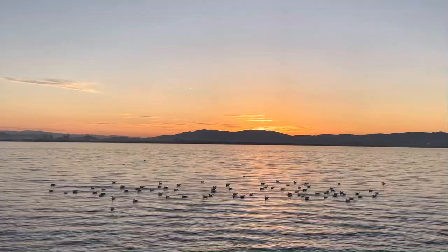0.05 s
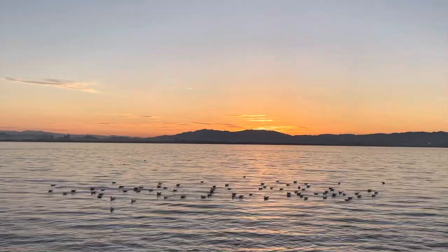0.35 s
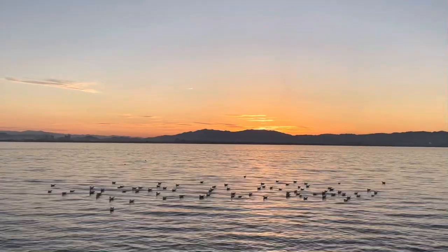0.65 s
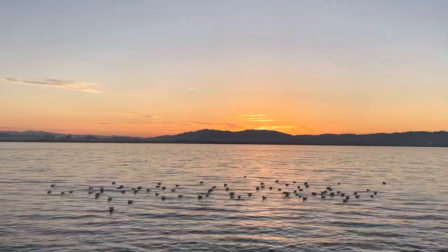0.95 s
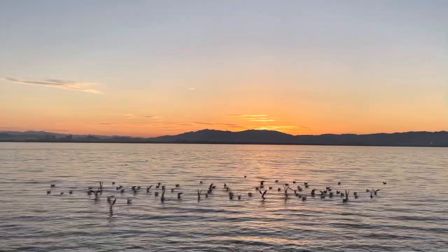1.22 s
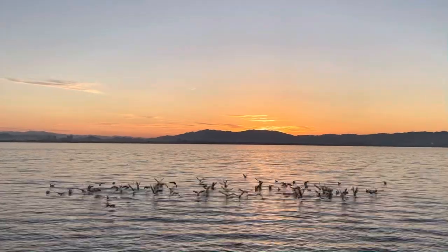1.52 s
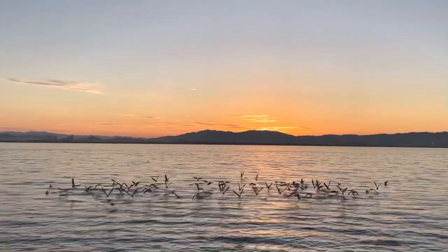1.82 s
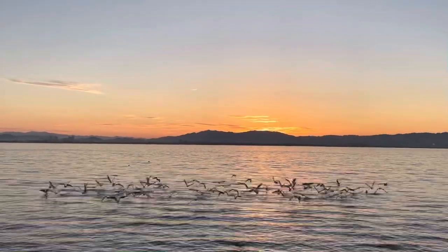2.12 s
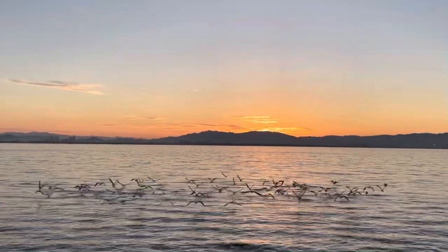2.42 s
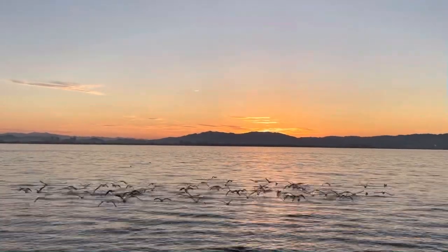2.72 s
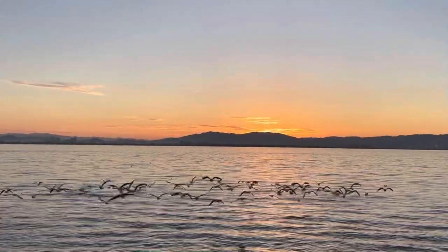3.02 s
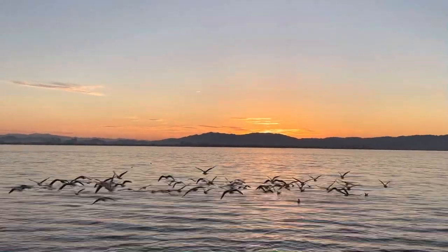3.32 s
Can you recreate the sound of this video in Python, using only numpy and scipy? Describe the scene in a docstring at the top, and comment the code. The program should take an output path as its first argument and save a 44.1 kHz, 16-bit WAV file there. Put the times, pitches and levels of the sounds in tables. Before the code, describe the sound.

A flock of gulls bursts into overlapping cries and rasps far out on a calm lake, wings pattering on the water, then gives two short barks. Wavelets lap and bubble close to the shoreside microphone throughout, over light wind.

```python
"""The shore of a calm lake, with a stereo microphone near the waterline. Close by, wavelets lap, splash
and bubble; a light wind rumbles underneath. Far out a flock of gulls lifts off, wings pattering on the
water, and bursts into overlapping calls: arched cries shaped by throat resonances, rasps chopped into
fast pulses, then two short barks as it flies off. The rippled water adds a short tail to each call."""
import sys
import numpy as np
from scipy import signal
from scipy.fft import rfft, irfft, next_fast_len
from scipy.io import wavfile
from scipy.ndimage import map_coordinates

SR = 44100
rng = np.random.default_rng(int(sys.argv[2]) if len(sys.argv) > 2 else 0)


def generate_wav(sig):
    """Save sig (samples, or channels by samples) to the path in sys.argv[1] as 16-bit PCM at SR."""
    pcm = np.round(np.clip(np.atleast_2d(sig).T, -1, 1) * 32767).astype(np.int16)
    wavfile.write(sys.argv[1], SR, pcm)


N = 156555
TOP_HZ = 13264  # upper band limit of the microphone


def amp(db):
    """Decibels as an amplitude."""
    return 10 ** (np.asarray(db) / 20)


def unit(x):
    """Scale to an rms of 1."""
    return x / np.sqrt(np.mean(x ** 2) + 1e-20)


def along(points, hz):
    """Read (frequency, value) points on a log frequency axis."""
    freqs, values = np.transpose(points)
    return np.interp(np.log(hz + 1), np.log(freqs + 1), values)


def curves(rows):
    """One value per sample for each column after the time."""
    times, *columns = np.transpose(rows)
    return [np.interp(np.arange(N) / SR, times, column) for column in columns]


def wobble(rate, size):
    """A smooth random curve, rate knots a second."""
    return map_coordinates(rng.standard_normal(2 ** 11), [np.arange(size) * rate / SR])


def glide(arc_hz, size):
    """A smooth arc of pitch through its start, middle and end."""
    return np.polyval(np.polyfit([0, .5, 1], arc_hz, 2), np.linspace(0, 1, size))


def filtered(x, response):
    """Apply a gain given as a function of frequency."""
    size = next_fast_len(N + SR // 2)
    return irfft(rfft(x, size) * response(np.fft.rfftfreq(size, 1 / SR)), size)[..., :N]


def add(track, start, sound, pan_db):
    """Mix a sound in at start seconds, pan_db louder on the left than on the right."""
    part = track[:, max(0, round(start * SR)):][:, :len(sound)]
    part += amp([[pan_db / 2], [-pan_db / 2]]) * sound[:part.shape[1]]


def spread(pair, colour):
    """Two unrelated signals become a coloured stereo field of rms 1, wider in the treble."""
    # likeness of left and right at the microphone (frequency [Hz], correlation [-1..1])
    likeness = [(60, 0.92), (130, 0.97), (300, 0.58), (1200, 0.15), (2500, 0.53), (5000, 0.24),
                (10000, -0.14)]

    def mid_side(hz):
        angle = np.arccos(np.clip(along(likeness, hz), -1, 1)) / 2
        return amp(along(colour, hz)) * [np.cos(angle), np.sin(angle)]
    mid, side = filtered(pair, mid_side)
    return unit(np.array([mid + side, mid - side]))


def rush(colour):
    """Coloured stereo noise."""
    return spread(rng.standard_normal((2, N)), colour)


def wind(rumble_db=-46.5, gust_db=1.55, hush_db=-61):
    """Light wind rumbles unsteadily under the far hush of the open lake."""
    # spectra of the wind and of the hush (frequency [Hz], relative level [dB])
    rumble_colour = [(12, -30), (24, -24), (35, -14.5), (60, 1.5), (75, -2), (97, -7.5), (173, -10.5),
                     (219, -12.5), (400, -26), (520, -58), (880, -85)]
    hush_colour = [(150, 2.5), (500, 12), (1500, -3), (5000, -24), (7500, -35), (12000, -46)]
    rumble = rush(rumble_colour) * amp(rumble_db + gust_db * wobble(9.93, N))
    return rumble + amp(hush_db) * rush(hush_colour)


def bubble(hz, cycles, rise=0.081):
    """A bubble rings and rises in pitch, dying by 60 dB over its cycles."""
    life = np.linspace(0, 1, int(SR * cycles / hz))
    ring = np.sin(2 * np.pi * cycles * (life + rise * life ** 2 / 2))
    return ring * amp(-60 * life) * (1 - np.exp(-life * cycles * 2))


def bubble_cloud(low_hz, high_hz, cycles, scatter_db, count):
    """Two unrelated streams of random bubbles, most faint and a few loud."""
    out = np.zeros((2, N))
    for when, pitch, size, side in rng.random((count, 4)):
        gain = amp(scatter_db * min(-np.log(1 - size), 4))
        hz = low_hz * (high_hz / low_hz) ** pitch
        add(out, when * N / SR, gain * bubble(hz, cycles), pan_db=20 * np.sign(side - .5))
    return out


def lapping(flicker_db=3):
    """Wavelets at the near shore gurgle with bubbles and fizz with spray."""
    # rise and fall of the wavelets (time [s], gurgle gain [dB], fizz gain [dB])
    wavelets = [(0, -58.5, -56), (.12, -54.5, -57), (.24, -51, -53.5), (.42, -51.5, -57.5), (.55, -56, -63),
                (.66, -59.5, -60.5), (.82, -59.5, -65), (.85, -53.5, -60.5), (1.05, -51.5, -58),
                (1.13, -62.5, -61), (1.26, -54, -58), (1.5, -54, -57), (2.75, -60.5, -65.5),
                (2.92, -59.5, -60), (3.12, -61.5, -66), (3.4, -63.5, -64), (3.55, -64.5, -63)]
    # spectra of the gurgle and of the fizz (frequency [Hz], relative level [dB])
    gurgle_colour = [(120, -37), (300, -3), (900, 1), (2000, -7), (3200, -14.5), (6000, -26)]
    fizz_colour = [(1200, -7.5), (2600, -2), (5200, 2.5), (6500, -3.5), (7700, -27), (9000, -7.5),
                   (12500, -12.5), (14000, -14)]
    gurgle_db, fizz_db = curves(wavelets)
    bubbles = spread(bubble_cloud(404, 3460, cycles=15, scatter_db=3.5, count=1500), gurgle_colour)
    spray = spread(bubble_cloud(1710, 12700, cycles=11.4, scatter_db=4, count=2500), fizz_colour)
    gurgle = amp(flicker_db * wobble(60, N)) * rush(gurgle_colour) + amp(-5.5) * bubbles
    fizz = amp(-2) * rush(fizz_colour) + amp(-4) * spray
    return amp(gurgle_db) * gurgle + amp(fizz_db) * fizz


def drops(tick_t60_s=0.013):
    """Single bubbles plop and droplets tick close to the microphone."""
    # ringing bubbles (time [s], level [dB], pitch [Hz])
    plops = [(0.045, -41.5, 3760), (0.217, -38.5, 3240), (0.245, -35.5, 3700), (.2, -43, 583),
             (0.244, -44, 1016), (.262, -44, 1030), (.292, -41, 459), (.899, -38.5, 1630),
             (0.942, -41.5, 464), (1.006, -40.5, 920), (1.19, -41, 2100), (1.379, -48, 1190),
             (1.46, -37.5, 2240), (2.912, -50, 1250)]
    # droplets landing (time [s], peak level [dB])
    ticks = [(0.139, -33.5), (0.714, -40), (1.037, -43), (1.165, -45), (1.295, -38.5), (1.435, -43),
             (2.671, -45), (2.75, -46), (2.8, -60), (3.192, -44), (3.534, -44.5)]
    out, t = np.zeros((2, N)), np.arange(SR // 20) / SR
    for start, db, hz in plops:
        add(out, start, amp(db) * bubble(hz, cycles=40), pan_db=rng.normal(0, 4.7))
    for start, db in ticks:
        soft_noise = signal.lfilter([.5, .5], [1, -.5], rng.standard_normal(len(t)))
        tick = soft_noise * amp(-60 * t / tick_t60_s)
        add(out, start, amp(db) * tick / abs(tick).max(), pan_db=rng.normal(0, 2.5))
    return out


def slaps(width_octaves=0.89, t60_s=0.034):
    """Wavelet crests break on the shore in small wet splashes."""
    # breaking crests (time [s], peak level [dB], band centre [Hz])
    crests = [(0.144, -42.5, 1200), (0.409, -41, 1190), (.25, -38.5, 910), (0.513, -40.5, 890),
              (.839, -37.5, 810), (.861, -44, 1900), (0.957, -48, 1700), (1.007, -41.5, 1170),
              (1.433, -35, 1140), (2.82, -50, 2400), (2.867, -46.5, 2470), (2.913, -52, 3620),
              (2.965, -48, 1990), (3.087, -48.5, 2180)]
    out, t = np.zeros((2, N)), np.arange(SR // 12) / SR
    for start, db, hz in crests:
        edges_hz = hz * 2 ** (width_octaves * np.array([-.5, .5]))
        band = signal.butter(2, edges_hz, "bandpass", fs=SR)
        splash = signal.lfilter(*band, rng.standard_normal(len(t))) * amp(-60 * t / t60_s)
        add(out, start, amp(db) * splash / abs(splash).max(), pan_db=rng.normal(0, 2.4))
    return out


def patter(flicker_db=3):
    """Far out, wing tips and feet beat the water in quick splashes."""
    # swell and fade of the take-off (time [s], level [dB])
    take_off = [(1.1, -68), (1.5, -61), (1.9, -54), (2.3, -44), (2.7, -60), (3.55, -76)]
    # spectrum of the distant splashing (frequency [Hz], relative level [dB])
    colour = [(200, -10), (900, 13), (2200, 15), (3500, -13), (5500, -8), (7500, -57), (13000, -52)]
    return rush(colour) * amp(curves(take_off)[0] + flicker_db * wobble(50, N))


def voice(pitch, overtone_db, jitter, hoarse=0.21, hoarse_hz=3000, attack_s=0.007, release_s=0.021):
    """A gull's voice: overtones on an unsteady pitch; hoarse is the noise-to-tone ratio at hoarse_hz."""
    t, mean_hz = np.arange(len(pitch)) / SR, pitch.mean()
    unsteady_hz = pitch * (1 + jitter * wobble(400, len(t)))
    phase = 2 * np.pi * np.cumsum(unsteady_hz) / SR
    # each overtone takes a new strength and phase every cycle; higher ones stray more
    count, cycles = 22, 256
    noise = rng.standard_normal((count, cycles)) + 1j * rng.standard_normal((count, cycles))
    share = hoarse * np.minimum(np.arange(1, count + 1)[:, None] * mean_hz / hoarse_hz, 2)
    strengths = (1 + share * noise) / np.sqrt(1 + share ** 2)
    strengths *= np.exp(2j * np.pi * rng.random((count, 1)))
    out = np.zeros(len(t))
    for k, strength in enumerate(strengths[:int(TOP_HZ / mean_hz)], 1):
        overtone = np.exp(1j * k * phase) * np.interp(t * mean_hz, np.arange(cycles), strength)
        out += amp(overtone_db(k)) * overtone.real
    return np.sqrt(2) * out * np.clip(t / attack_s, 0, 1) * np.clip((t[-1] - t) / release_s, 0, 1)


def flock(low_hz=560, high_hz=1000, length_s=.17, arch=.3, count=34):
    """The farthest gulls: many arched, fluttering calls blend into a chorus."""
    # swell and fade of the chorus (time [s], relative level [dB])
    swell = [(1.58, -64), (1.7, -43.5), (1.82, -38.5), (2.0, -36.5), (2.25, -43.5), (2.42, -43.5),
             (2.6, -55), (2.72, -62.5), (2.9, -89)]
    # spectrum of the far voices (frequency [Hz], relative level [dB])
    colour = [(400, -50), (700, -10), (950, 1), (1250, 4), (1500, 0), (1950, 5), (2500, -1.5), (2900, -15),
              (4000, -6), (4600, 0.5), (5300, 1), (6400, -48), (9000, -13), (13000, -23.5)]
    out, life = np.zeros((2, N)), np.linspace(0, 1, int(length_s * SR))
    for start, (pitch, trill, side) in zip(np.linspace(1.5, 2.75, count), rng.random((count, 3))):
        hz = low_hz * (high_hz / low_hz) ** pitch * (1 - arch * (life - .35) ** 2)
        flutter = 1 + .7 * np.sin(2 * np.pi * (70 + 60 * trill) * length_s * life)
        add(out, start, voice(hz, lambda k: 0, jitter=.026) * flutter, pan_db=10 * (side - .5))
    chorus = filtered(out, lambda hz: amp(along(colour, hz)))
    return unit(chorus) * np.sqrt(1 / 3) * amp(curves(swell)[0])


def throat_calls(calls, jitter, hoarse, swell, roughness=0.3):
    """Each call is an arc of pitch and level sent through three throat resonances."""
    # centres of the resonances (low [Hz], middle [Hz], high [Hz])
    throat_hz = (1230, 1910, 2430)
    # skirts below the low and above the high one (frequency [Hz], level against that resonance [dB])
    below = [(450, -45), (620, -22.5), (830, -4)]
    above = [(3200, -7.5), (4500, -4.5), (6500, 1.5), (9000, -31), (13000, -36)]
    out = np.zeros((2, N))
    for start, length, *arc_hz, low_db, mid_db, high_db, pan_db in calls:
        n = int(length * SR)
        pitch = glide(arc_hz, n)
        throat = [(hz, low_db + db) for hz, db in below]
        throat += zip(throat_hz, (low_db, mid_db, high_db))
        throat += [(hz, high_db + db) for hz, db in above]
        call = voice(pitch, lambda k: along(throat, k * pitch), jitter, hoarse)
        envelope = np.hanning(n) ** swell * (1 + roughness * wobble(211, n))
        add(out, start, call * envelope, pan_db)
    return out


def cries():
    """Overlapping cries carry across the water, fairly clear in tone."""
    # gull cries (time [s], length [s], start, middle, end pitch [Hz],
    # low, middle, high resonance level [dB], left minus right [dB])
    calls = [(1.577, 0.13, 541, 656, 602, -50, -79, -57.5, 10),
             (1.686, 0.095, 848, 1150, 978, -41.5, -87, -46, -0.5),
             (1.763, 0.29, 648, 640, 641, -57, -47.5, -51.5, 8),
             (1.78, .18, 534, 577, 466.5, -45.5, -74, -49, -1),
             (1.925, 0.053, 850, 910, 780, -49.5, -43, -47.5, -2),
             (1.966, 0.12, 638.4, 627, 629, -41.5, -38.5, -50, -2),
             (2.05, 0.25, 605, 610, 514.7, -44, -47, -56, -1.5),
             (2.06, 0.17, 632, 660, 717, -49.5, -47.5, -52, 1.5),
             (2.21, 0.067, 860, 830, 763, -50, -43, -54, -1),
             (2.221, .11, 1029, 1010, 984, -50, -38, -47, -0.5),
             (2.243, 0.22, 632, 667, 619, -48.5, -65, -52, 5),
             (2.332, .15, 999, 910, 669, -48.5, -51.5, -55, 1),
             (2.36, 0.088, 990, 950, 836, -59, -52, -63, 3), (2.45, .11, 635, 630, 617, -66, -53, -51.5, 3),
             (2.55, 0.17, 952, 890, 906, -62, -62.5, -69.5, 7),
             (2.61, 0.069, 763, 680, 610, -54.5, -59, -75, 2),
             (2.668, 0.056, 858, 1050, 1240, -53.5, -77, -79, 0),
             (2.675, 0.064, 822, 770, 670, -53, -54, -84, 2), (2.72, .085, 667, 725, 733, -52, -63, -80, 1)]
    return throat_calls(calls, jitter=0.015, hoarse=0.45, swell=.08)


def rasps(ring_overtone=8, trill_drift=.05, bend=.014, sharpness=.9):
    """The voice is chopped into fast pulses, each bending in pitch; one high overtone rings loudest."""
    # trilled calls (time [s], length [s], trill rate [Hz], start, middle, end ring [Hz],
    # jitter [share of pitch], level [dB], left minus right [dB])
    calls = [(1.58, 0.11, 71.6, 5460, 5650, 5390, 0.04, -44.5, 1),
             (1.599, 0.058, 71, 4700, 5100, 5070, 0.019, -43, -1),
             (1.639, 0.062, 71.4, 4900, 4850, 4850, 0.011, -39, 1),
             (1.687, .11, 117.4, 5100, 4100, 4630, 0.029, -47, 9),
             (1.691, 0.087, 88, 4900, 5400, 5130, 0.052, -43, 1),
             (1.764, 0.084, 112, 5900, 5500, 5530, 0.042, -40.5, 1),
             (1.797, 0.12, 119.5, 5290, 5250, 5090, 0.0152, -35, 0.5),
             (1.8, 0.109, 101.5, 4450, 4520, 4720, 0.028, -50, 6),
             (1.935, .11, 111, 5800, 4040, 4520, 0.024, -44, 3),
             (1.943, 0.14, 127.9, 4700, 4900, 5020, 0.032, -38.5, 0),
             (1.93, 0.22, 95.6, 5500, 5400, 5240, .035, -39.5, 2.5),
             (2.042, 0.19, 102.1, 4650, 4520, 4700, 0.019, -40, -2.5),
             (2.132, .14, 95.7, 5000, 5200, 5090, 0.021, -41, 3),
             (2.204, .075, 111, 4450, 4350, 4190, 0.024, -44.5, -1),
             (2.261, .135, 115.5, 4400, 3800, 3880, 0.028, -52.5, 1),
             (2.265, .175, 106.3, 6100, 4700, 4490, 0.028, -50.5, -1),
             (2.354, 0.23, 105.2, 5400, 4750, 4840, 0.032, -51.5, 4),
             (2.503, 0.073, 111.6, 4200, 4600, 4260, .013, -48.5, 0),
             (2.551, 0.088, 112.6, 4100, 4280, 4050, 0.02, -48, -1),
             (2.565, 0.098, 100, 4100, 3900, 4550, .028, -61, -3)]
    # overtones of a rasp (frequency [multiple of pitch], relative level [dB])
    colour = [(1, -30), (2, -9), (3, -10), (4, -10), (5, -6), (6, -36), (7, -34), (8, 8), (9, 1), (10, -8),
              (12, -6.5), (13, -20.5), (20, -37)]
    out = np.zeros((2, N))
    for start, length, trill_hz, *ring_hz, jitter, db, pan_db in calls:
        n = int(length * SR)
        pulse_hz = trill_hz * (1 + trill_drift * wobble(63, n))
        pulse = -np.cos(2 * np.pi * np.cumsum(pulse_hz) / SR)
        pitch = glide(ring_hz, n) / ring_overtone * (1 + bend * (pulse - .5))
        rasp = voice(pitch, lambda k: along(colour, k), jitter) * (1 + pulse) ** sharpness
        add(out, start, amp(db) * unit(rasp), pan_db)
    return out


def barks():
    """Two short barks from the departing flock, harsh with noise and unsteady pitch."""
    # gull barks (time [s], length [s], start, middle, end pitch [Hz],
    # low, middle, high resonance level [dB], left minus right [dB])
    calls = [(3.138, 0.083, 761, 853, 713, -51, -52.5, -65.5, 0),
             (3.275, .075, 732, 847, 677, -46.5, -51, -61, 0)]
    return throat_calls(calls, jitter=0.055, hoarse=0.8, swell=0.59)


def arrival(x):
    """Sound from out on the lake reaches the two sides of the microphone slightly apart."""
    # phase between the sides (frequency [Hz], lead of the left [rad])
    lead = [(520, 0), (1500, 0.59), (3600, 1.02), (5000, 1.12), (6500, 2.55), (13000, 1.15)]
    return filtered(x, lambda hz: np.exp(1j * along(lead, hz) * np.array([[.5], [-.5]])))


def water_echo(x, level_db=-8.5, t60_s=0.045):
    """The rippled water scatters a short tail after each call."""
    t = np.arange(SR // 2) / SR
    tail = rng.standard_normal((2, len(t))) * amp(-60 * t / t60_s)
    return amp(level_db) * signal.fftconvolve(x, tail / np.linalg.norm(tail[0]), axes=1)[:, :N]


def scene():
    """Gulls in the distance, water close by and wind all around."""
    gulls = arrival(rasps() + cries() + barks() + flock())
    return gulls + water_echo(gulls) + patter() + lapping() + slaps() + drops() + wind()


def record(dry, dip_hz=7750, dip_width_hz=500, dip_db=-14):
    """The microphone has a narrow dip in the treble and keeps nothing above its band limit."""
    def response(hz):
        dip = np.exp(-((hz - dip_hz) / dip_width_hz) ** 2)
        return amp(dip_db * dip) * (hz < TOP_HZ)
    return filtered(dry, response)


dry = scene()
out = record(dry)
generate_wav(out)
```